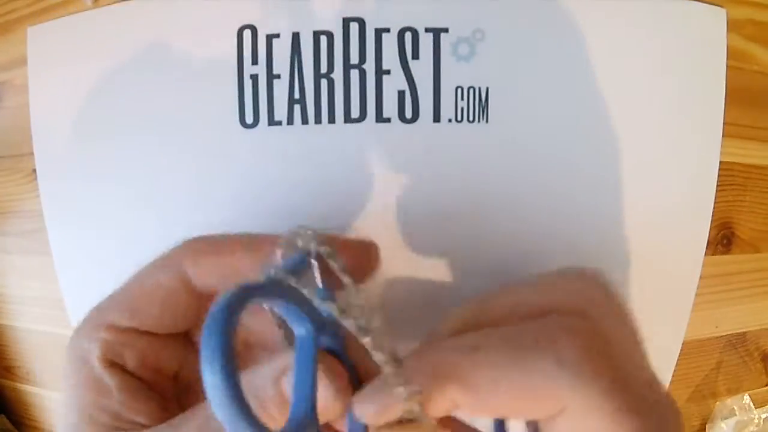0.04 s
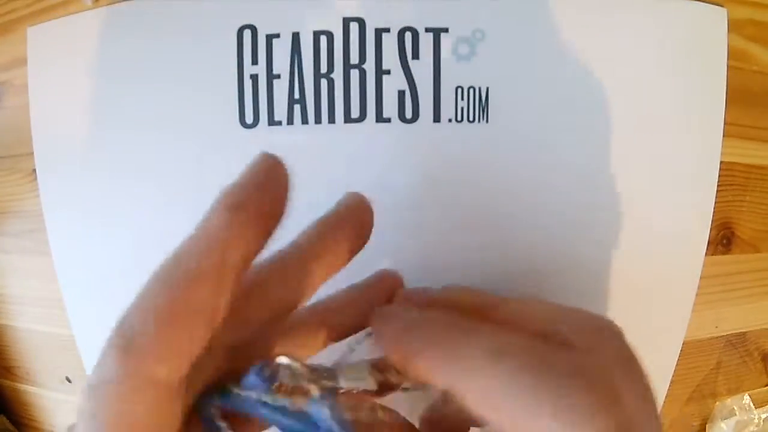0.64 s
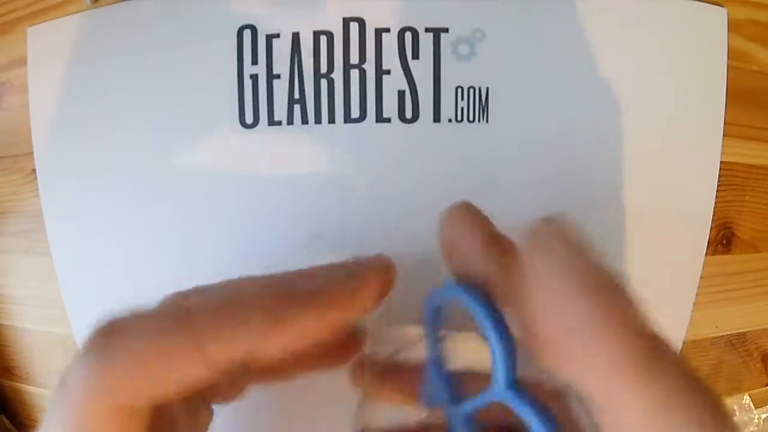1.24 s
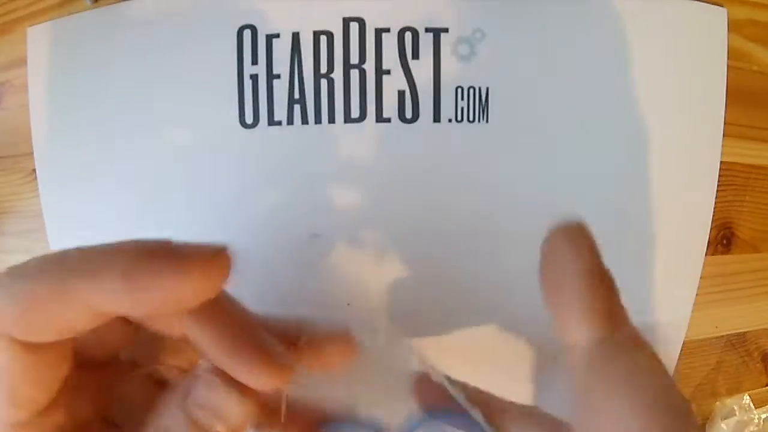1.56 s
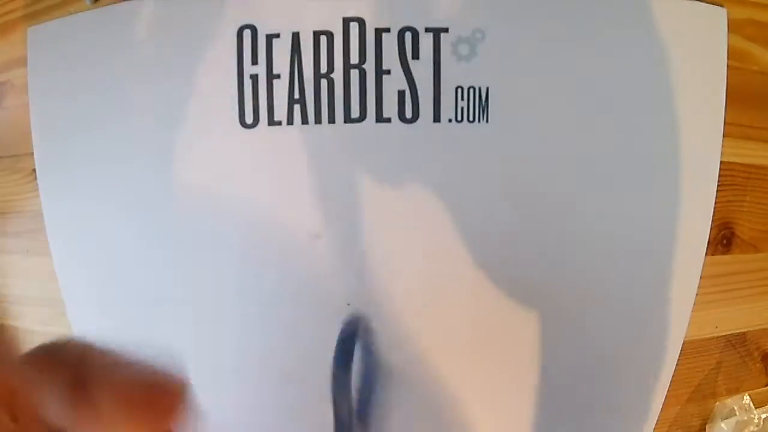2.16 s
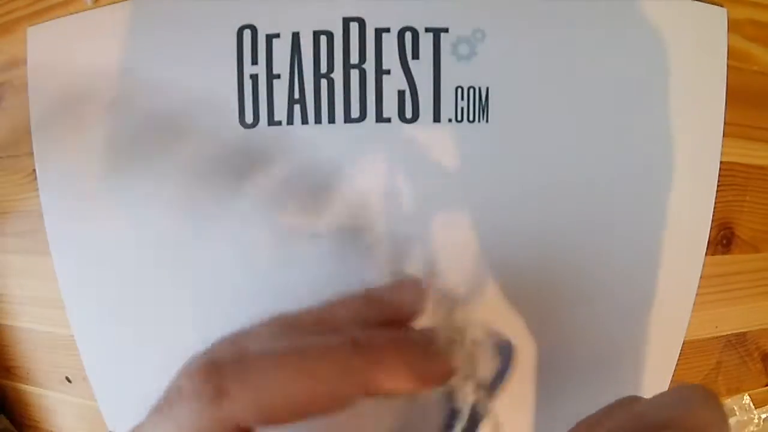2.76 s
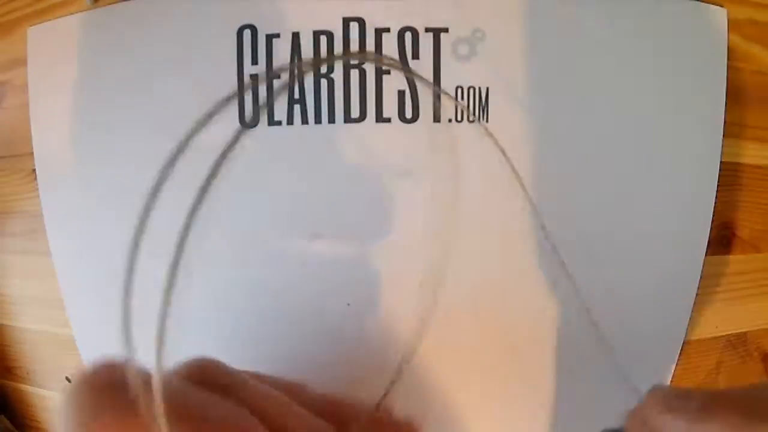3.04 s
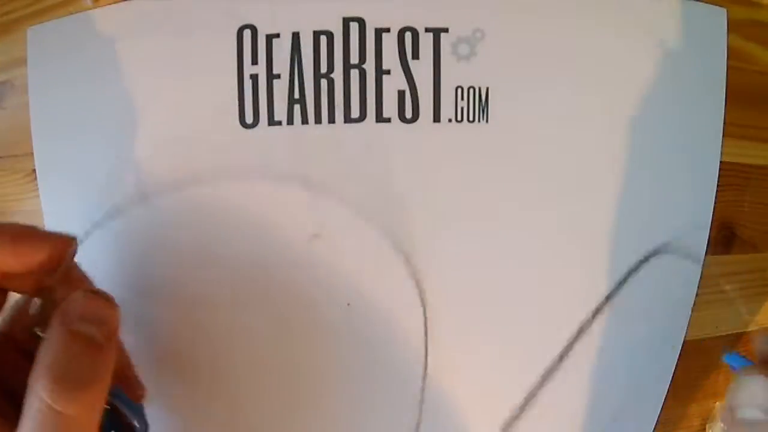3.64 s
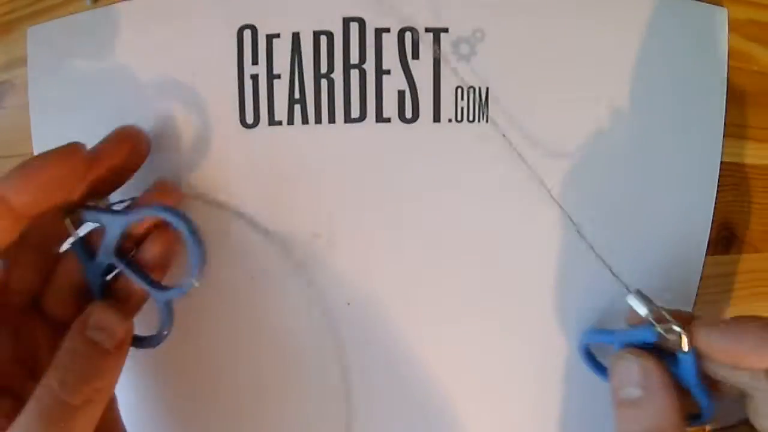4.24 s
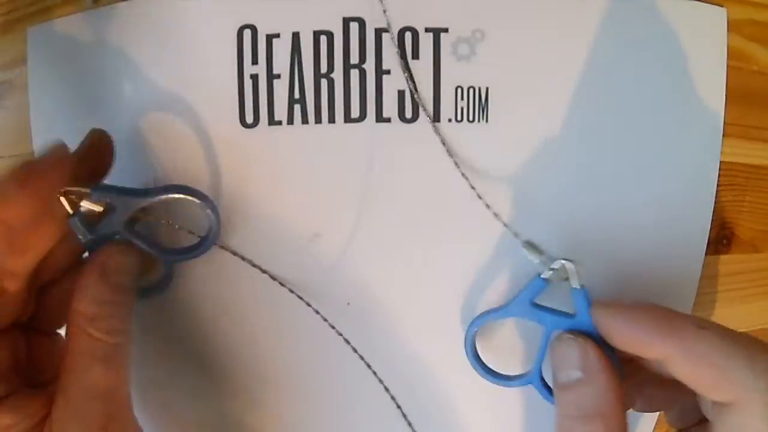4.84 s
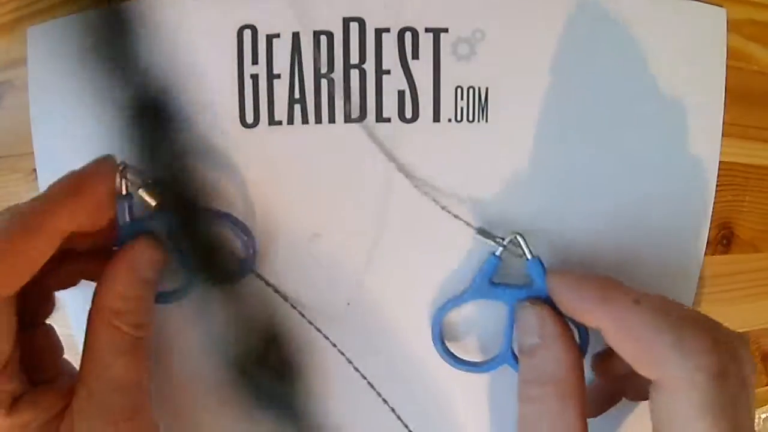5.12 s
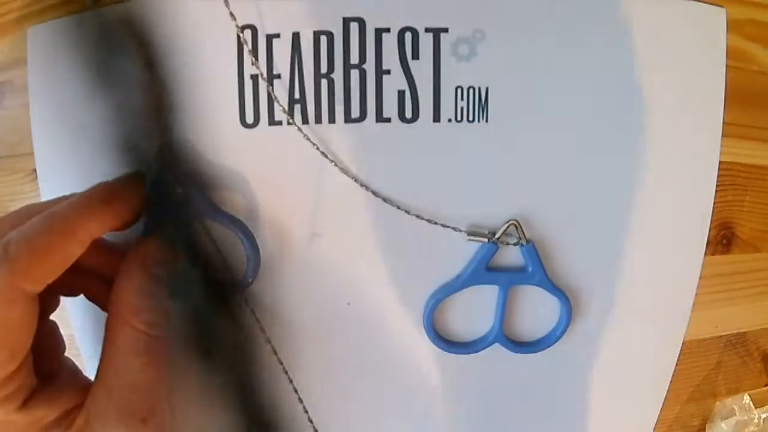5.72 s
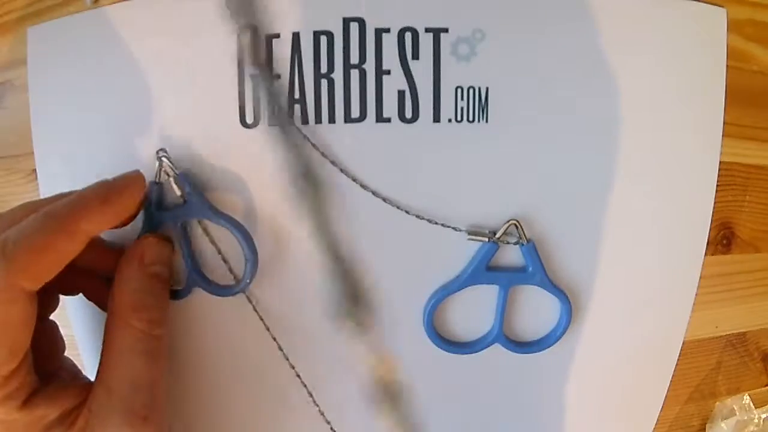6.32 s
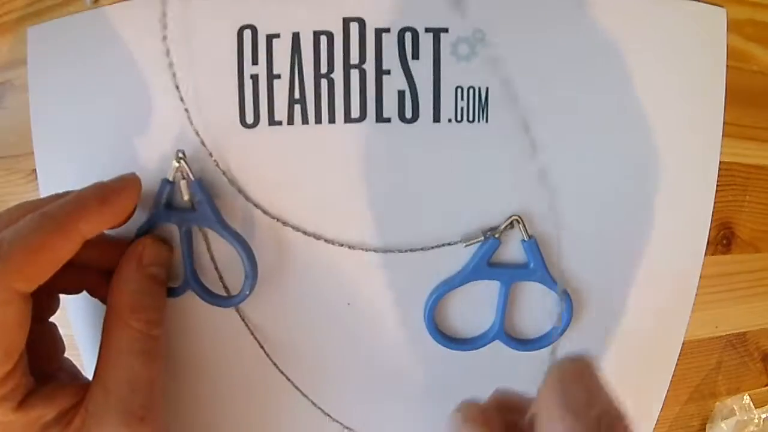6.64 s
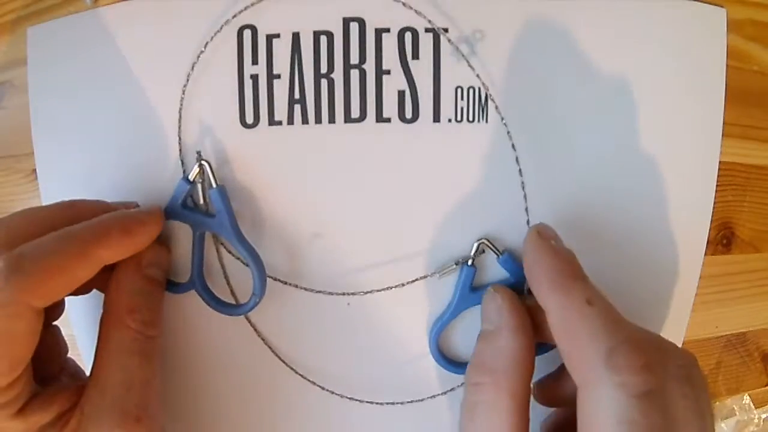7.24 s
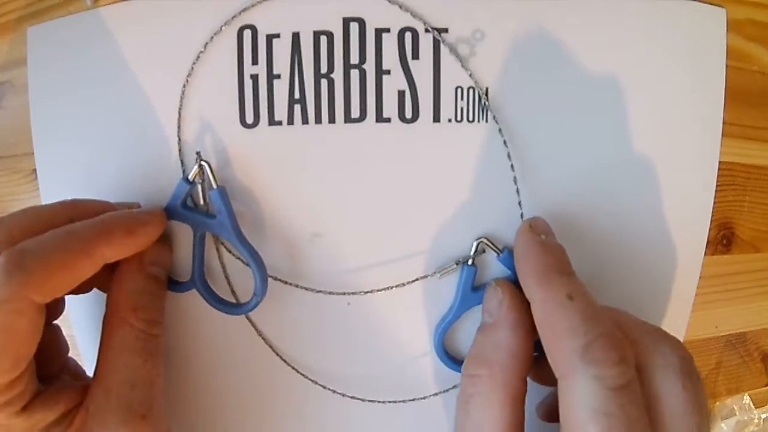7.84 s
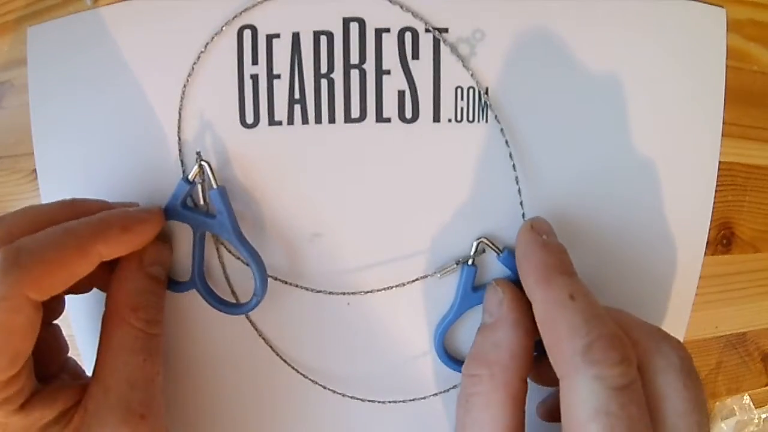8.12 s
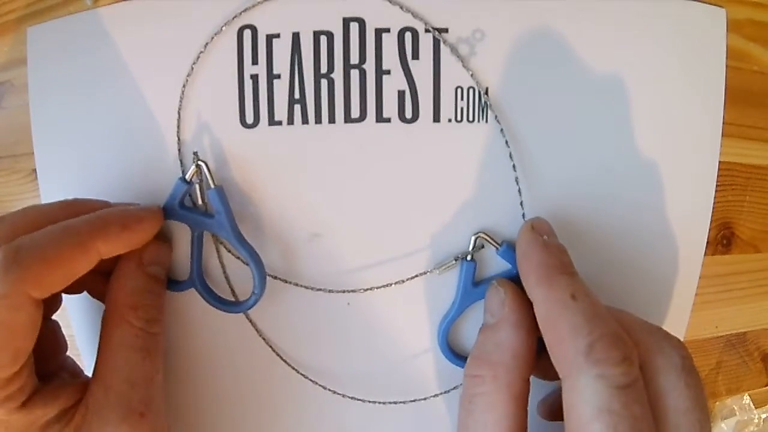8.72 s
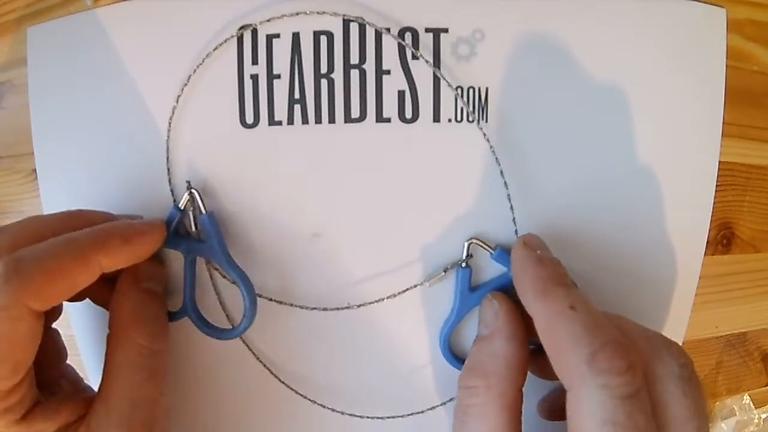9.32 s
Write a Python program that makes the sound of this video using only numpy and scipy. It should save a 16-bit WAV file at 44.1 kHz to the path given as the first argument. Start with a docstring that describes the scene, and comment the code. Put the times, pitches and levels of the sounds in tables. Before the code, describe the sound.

A springy wire is uncoiled by hand, crackling, twanging and scraping, and lashes against the microphone with loud, sharp knocks.

```python
"""Hands uncoil a twisted wire saw with plastic ring handles over a wooden table, under a small camera.
Over room air and a faint fan whine, skin rubs and the coil crackles and ticks. The table is bumped (1.8 s)
and the springy wire lashes the camera (2.1 s). The wire twangs (3 s) and strands rasp as the loops open;
a handle chafes in its link (4.1 s). The wire lashes again (4.6 s), drags along the housing and rattles
off it (5.05 s). The loop brushes the table (5.7 s); a few faint ticks and hand movements follow."""
import sys
import numpy as np
from scipy import signal
from scipy.fft import rfft, irfft
from scipy.io import wavfile

SR = 44100
rng = np.random.default_rng(int(sys.argv[2]) if len(sys.argv) > 2 else 0)


def digitize_waveform(pressure):
    """Quantize a signal to 16-bit integers and store it at the path in sys.argv[1].

    Rows of a 2-D input are taken as channels; values are limited to [-1, 1].
    """
    field = np.atleast_2d(pressure).T
    bounded = np.clip(field, -1, 1)
    quanta = np.round(bounded * 32767).astype(np.int16)
    wavfile.write(sys.argv[1], SR, quanta)


N = 417627
TIME_S = np.arange(N) / SR

# Source spectra. Each row: frequency in Hz, relative spectral density in dB.
AIR_SPECTRUM = [(15, -78), (25, -40.5), (141, -13), (174, -13.5), (204, -7), (353, -3.5), (393, -4.5),
                (436, -4), (663, -3.5), (718, -4.5), (776, -3.5), (885, -5.5), (2050, -18), (6330, -43.5),
                (9000, -53), (13200, -54.5)]
HAND_SPECTRUM = [(100, -19.5), (250, 6.5), (600, 5.5), (1100, 3), (1800, -0.5), (2600, -13), (5000, -32),
                 (9000, -48)]
COIL_SPECTRUM = [(1000, -14), (1700, 25), (3000, 2.5), (4500, -0.5), (5800, -3), (7000, -28), (8200, -17),
                 (9200, -0.5), (10500, -10.5), (12300, -11), (13500, -27)]
CRACK_SPECTRUM = [(290, -49.5), (500, -2), (1250, -7), (2220, 2), (2660, -18), (2920, -3.5), (3790, 2),
                  (4290, -13.5), (5060, -11.5), (6100, -17.5), (7120, -41), (9890, -33), (13200, -48.5)]
LASH_SPECTRUM = [(25, 7.5), (300, 5), (750, 1.5), (1000, -4), (1600, -10), (3100, -16), (4900, -25),
                 (6200, -29.5), (7200, -48), (9600, -43.5), (11500, -48), (13200, -70)]
UNWIND_SPECTRUM = [(700, -29.5), (1300, -7.5), (1800, 6), (2500, 5), (3050, -1), (3400, 1.5), (4000, -6),
                   (5000, -14.5), (6200, -21.5), (7100, -40.5), (9000, -36), (13000, -54)]
CHAFE_SPECTRUM = [(500, -35.5), (1200, -9), (1700, -2.5), (2600, 0), (3600, 0), (4000, -14), (6000, -21.5),
                  (7200, -42), (12000, -47)]
DRAG_SPECTRUM = [(88, -34), (150, -26.5), (210, -22), (546, -20.5), (611, 0), (780, -32.5), (856, -11),
                 (1530, -13.5), (2140, -5), (2540, -12.5), (3760, -8.5), (5070, -20), (7110, -48),
                 (9070, -36.5), (13200, -60)]
SWEEP_SPECTRUM = [(1200, 1.5), (2200, 4.5), (3100, -2), (4500, -2), (6000, -19.5), (7000, -35), (9500, -29),
                  (12000, -49), (14000, -51)]

# Resonances. Each row: frequency in Hz, T60 in seconds, gain at the peak in dB.
COIL_MODES = [(3020, 0.046, 17.5), (4840, .015, 3), (5770, 0.026, 14.5), (6200, 0.012, 11),
              (9060, 0.029, 3), (10800, .02, 7), (12400, 0.016, 8)]
TABLE_MODES = [(320, 0.035, 1.5), (419, 0.16, 4), (626, 0.12, -0.5), (719, 0.16, 10.5), (842, 0.018, -1.5),
               (1123, 0.04, -17.5)]
HOUSING_MODES = [(610, 0.087, -19.5), (1260, 0.094, -26), (1390, .04, -11), (2520, 0.025, -11.5),
                 (2813, 0.087, -13.5), (4000, 0.069, -16), (4750, .025, -10)]
UNWIND_MODES = [(2577, 0.057, 11.5), (2770, 0.06, 5), (3005, 0.031, 13.5), (3890, .03, 13),
                (4513, 0.025, 7), (4960, 0.037, 0)]
DRAG_MODES = [(610, .06, -6.5), (1298, .04, 0), (2220, .04, 10.5), (3440, 0.0083, 6.5), (3950, .025, 10),
              (4990, 0.016, 14.5), (6130, 0.024, 23.5)]
SWEEP_MODES = [(3100, 0.039, 23), (3530, 0.023, 14.5), (4240, 0.04, 7), (4380, 0.024, -1), (5010, 0.033, 9),
               (6000, 0.014, 10.5)]

# Fan tones. Each row: frequency in Hz, rms level in dB.
FAN_TONES = [(430, -71.5), (706.5, -65), (8000, -107)]
# Skin and sleeve movement. Each row: time in seconds, relative level in dB.
HAND_LEVELS = [(0, -56.5), (1.3, -59), (1.75, -57), (1.9, -57), (2.05, -61.5), (2.55, -57.5), (2.9, -64),
               (3.2, -92.5), (8.8, -67), (9.45, -60.5)]
# Coil shifting in the fingers. Each row: start in seconds, length in seconds, level in dB.
COIL_SHIFTS = [(0.106, 0.014, -73.5), (0.151, 0.023, -76.5), (.295, .04, -64.5), (0.361, .06, -72.5),
               (.54, 0.028, -74.5), (0.61, .19, -76), (0.806, 0.0047, -54.5), (1.013, .012, -77),
               (1.115, 0.019, -63.5), (1.33, 0.056, -79.5), (1.582, .01, -76.5), (1.637, 0.013, -79),
               (2.753, .07, -84.5)]
# Small knocks. Each row: start in seconds, peak in dB, ring in Hz, T60 in seconds, crack-to-ring in dB.
TICKS = [(0.684, -40.5, 1800, 0.016, -19), (0.8098, -32, 2970, 0.054, -1), (1.125, -36.5, 2870, 0.041, -14),
         (1.8412, -45.5, 2060, .03, -6), (2.381, -43.5, 2960, 0.047, -6),
         (3.0451, -13.5, 2310, 0.0065, -16.5), (4.136, -39.5, 2240, .01, -21), (4.56, -43, 3240, .03, -9),
         (5.3213, -46, 2290, .03, -6), (5.7119, -20.5, 3780, 0.0087, -10), (5.7668, -31, 2300, .027, -12),
         (5.7874, -30.5, 2225, 0.031, -3), (7.2439, -50.5, 3303, 0.022, -10),
         (9.0618, -50.5, 1880, .02, -3), (9.079, -51, 4920, .02, 6)]
# Knocks on the table, and the low body of the wire's twang at 3.04 s.
# Each row: start in seconds, peak in dB, skid decay in seconds.
BUMPS = [(1.843, -21, 0.0073), (3.041, -33.5, 0.004), (5.014, -29, 0.0097), (5.05, -32.5, 0.016),
         (5.124, -38, 0.0032), (5.71, -40, 0.0031)]
# Wire hitting the camera. Each row: start in seconds, bounce count, thump in dB, clang in dB,
# clang centre in Hz, low cut in Hz.
LASHES = [(2.11, 3, -21, -17.5, 1874, 19), (2.127, 3, -19, -23.5, 1440, 20),
          (2.1407, 5, -15, -19.5, 1886, 30), (2.2521, 2, -18, -17.5, 1850, 10),
          (2.2633, 1, -14.5, -15, 1230, 9), (2.274, 1, -17, -15, 1160, 10), (2.576, 2, -13, -15, 1950, 43),
          (2.667, 2, -14, -16.5, 1400, 35), (4.619, 3, -21, -21.5, 1073, 30),
          (4.6428, 1, -18.5, -15, 1475, 20), (4.6562, 2, -11.5, -26, 1800, 8.8),
          (4.689, 3, -16.5, -16.5, 1700, 40), (4.711, 1, -12, -12.5, 1720, 7),
          (4.7208, 1, -10.5, -20.5, 1440, 10), (4.727, 1, -20, -27.5, 1160, 30),
          (4.7356, 2, -12, -19, 2200, 11), (5.1767, 1, -12.5, -20.5, 2260, 190)]
# Sliding strokes. Each row: start in seconds, length in seconds, level in dB, relative treble in dB.
UNWIND_STROKES = [(3.045, 0.054, -46.5, -11), (3.135, 0.072, -51, -14.5), (3.235, 0.056, -53, -25),
                  (3.305, 0.13, -49.5, -16), (3.44, 0.069, -57, 0.5), (3.555, 0.13, -55, -2.5),
                  (3.772, 0.067, -57, -3), (3.895, 0.041, -60.5, -12), (4.025, 0.015, -67, 2),
                  (4.3, 0.0517, -67, -2), (4.35, 0.035, -60, 1.5), (4.4, .1, -60.5, -16),
                  (4.555, 0.012, -57.5, -1)]
CHAFE_STROKES = [(4.134, .08, -51.5, -22), (4.25, .016, -58.5, -24)]
DRAG_STROKES = [(4.665, 0.049, -36, -3.5), (4.745, 0.066, -56, -11), (4.789, 0.086, -43.5, -5.5),
                (4.873, .06, -47.5, -8), (4.938, 0.079, -42.5, -4), (5.04, 0.037, -51, -3),
                (5.113, 0.0098, -42, -6), (5.15, 0.011, -34.5, -9), (5.185, 0.021, -40, -10)]
SWEEP_STROKES = [(5.71, .06, -70, -2), (5.805, 0.025, -64.5, 0.5), (6.18, 0.08, -68, -14),
                 (6.24, 0.041, -61, -17), (6.3, 0.046, -51.5, -10), (6.35, 0.037, -55.5, -0.5),
                 (6.573, .033, -59, 1), (6.72, 0.026, -64, -12), (6.8, 0.11, -60.5, -9),
                 (6.865, 0.034, -55.5, -9)]
# Room decay. Each row: frequency in Hz, T60 in seconds.
ROOM_DECAY = [(200, 0.13), (1000, 1), (4000, 0.15), (12000, 0.099)]


def amp(db):
    """Decibels to gain."""
    return 10 ** (np.asarray(db) / 20)


def unit_rms(x):
    """Scales to rms 1."""
    return x / np.sqrt(np.mean(x ** 2) + 1e-30)


def lookup(table, hz):
    """Interpolates on a log-frequency axis."""
    table_hz, values = np.transpose(table)
    return np.interp(np.log(hz + 1), np.log(table_hz + 1), values)


def add(mix, start_s, sound):
    """Mixes a sound in at start_s."""
    part = mix[max(round(start_s * SR), 0):][:len(sound)]
    part += sound[:len(part)]


def colour(x, spectrum, size=2048):
    """Minimum-phase filter with the given spectrum."""
    hz = abs(np.fft.fftfreq(size, 1 / SR))
    log_gain = np.log(amp(np.maximum(lookup(spectrum, hz), -100)))
    taps = np.fft.ifft(np.exp(np.conj(signal.hilbert(log_gain)))).real
    return signal.oaconvolve(x, taps[:size // 2])[:len(x)]


def band(x, low_hz, high_hz):
    """Butterworth band-pass."""
    return signal.sosfilt(signal.butter(4, [low_hz, high_hz], "band", fs=SR, output="sos"), x)


def ringing(x, modes):
    """Response of damped modes driven by x."""
    out = np.zeros(len(x))
    for hz, t60_s, db in modes:
        radius = np.exp(-np.log(1000) / (t60_s * SR))
        pole = radius * np.exp(2j * np.pi * hz / SR)
        out += amp(db) * 2 * signal.lfilter([1 - radius], [1, -pole], x + 1e-18).real
    return out


def stroke(t, start_s, length_s, attack_s, release_s):
    """Envelope of one slide: speeds up, holds, dies away."""
    rise = np.clip((t - start_s) / attack_s, 0, 1)
    return rise * np.exp(-np.clip((t - start_s - length_s) / release_s, 0, 20))


def slips(samples, per_s, spread_db, clump_db, clump_s, hiss):
    """Stick-slip friction: uneven clicks over a smooth rub, in clumps."""
    sizes = amp(spread_db * np.minimum(rng.exponential(1, samples), 3.5))
    clicks = sizes * rng.choice([-1, 1], samples) * (rng.random(samples) < per_s / SR)
    rub = unit_rms(clicks) + hiss * rng.standard_normal(samples)
    t = np.arange(samples) / SR
    knots_s = np.arange(0, t[-1] + clump_s, clump_s)
    return rub * amp(clump_db * np.interp(t, knots_s, rng.uniform(-1.5, 1, len(knots_s))))


def scrape(strokes, spectrum, modes, per_s, clump_db, attack_s, release_s, detune=0.023):
    """Surfaces catch and slip; any modes are retuned slightly for each stroke."""
    t, out = np.arange(16384) / SR, np.zeros(N)
    highpass = signal.butter(4, 4200, "high", fs=SR, output="sos")
    for start_s, length_s, db, treble_db in strokes:
        rub = slips(len(t), per_s, spread_db=2, clump_db=clump_db, clump_s=.009, hiss=.6)
        retuned = [(hz * (1 + detune * rng.uniform(-0.82, 1)), *rest) for hz, *rest in modes]
        rub = colour(rub + ringing(rub, retuned), spectrum)
        treble = signal.sosfiltfilt(highpass, rub)
        body = (rub - treble) / np.std(band(rub, 2000, 4200))
        gain = amp(db) * stroke(t, 0, length_s, attack_s, release_s)
        add(out, start_s, gain * (body + amp(treble_db) * unit_rms(treble)))
    return out


def room_air(rms_db=-56):
    """Steady air noise."""
    return amp(rms_db) * unit_rms(colour(rng.standard_normal(N), AIR_SPECTRUM, size=8192))


def fan_whine(waver_hz=1.5):
    """Faint fan tones, each wavering in pitch."""
    knots_s, out = np.arange(0, TIME_S[-1] + 1, .1), np.zeros(N)
    for hz, db in FAN_TONES:
        drift_hz = waver_hz * np.interp(TIME_S, knots_s, rng.standard_normal(len(knots_s)))
        out += amp(db) * np.sqrt(2) * np.sin(2 * np.pi * np.cumsum(hz + drift_hz) / SR)
    return out


def hands(trim_db=-1):
    """Soft, dull friction of skin and cloth."""
    rub = colour(slips(N, per_s=1500, spread_db=2, clump_db=1, clump_s=.03, hiss=1), HAND_SPECTRUM)
    gain = amp(trim_db + np.interp(TIME_S, *np.transpose(HAND_LEVELS)))
    return gain * rub / np.std(band(rub, 660, 2200))


def coil_crackle(attack_s=.006, release_s=.009):
    """Turns rub in the fingers; each slips on its own and rings its own mode."""
    rub, *turns = [slips(N, per_s=600, spread_db=2.5, clump_db=6, clump_s=.012, hiss=.2)
                   for _ in range(len(COIL_MODES) + 1)]
    tinkle = sum(ringing(turn, [mode]) for turn, mode in zip(turns, COIL_MODES))
    crackle = colour(rub + tinkle, COIL_SPECTRUM)
    gain = sum(amp(db) * stroke(TIME_S, start_s, length_s, attack_s, release_s)
               for start_s, length_s, db in COIL_SHIFTS)
    return gain * crackle / np.std(band(crackle, 4500, 13000))


def tick(peak_db, ring_hz, t60_s, crack_db, crack_s=0.0018, tail_s=0.015, tail_db=-20):
    """A short crack and one ring, pitched by the free length of wire."""
    t = np.arange(4096) / SR
    decay = np.exp(-t / crack_s) + amp(tail_db) * np.exp(-t / tail_s)
    crack = colour(rng.standard_normal(len(t)) * decay, CRACK_SPECTRUM)
    onset = 1 - np.exp(-(t / 0.00033) ** 2)
    ring = onset * np.sin(2 * np.pi * ring_hz * t) * np.exp(-np.log(1000) * t / t60_s)
    sound = ring + amp(crack_db) * 2 * crack / abs(crack).max()
    return amp(peak_db) * sound / abs(sound).max()


def ticks():
    """Wire, crimps and handles knock together."""
    out = np.zeros(N)
    for start_s, *settings in TICKS:
        add(out, start_s, tick(*settings))
    return out


def bumps(direct_gain=0.38):
    """Soft knocks ring the table top, longer in a skid; one bump is the low body of the wire's twang."""
    t, out = np.arange(8192) / SR, np.zeros(N)
    for start_s, peak_db, skid_s in BUMPS:
        push = rng.standard_normal(len(t)) * np.exp(-t / skid_s)
        bump = band(direct_gain * push + ringing(push, TABLE_MODES), 300, 1280)
        add(out, start_s, amp(peak_db) * bump / abs(bump).max())
    return out


def bounces(gap_s=.0045, jitter_s=.0006, spread_db=4.5, rasp_db=-30.5):
    """Splits each lash into quick, uneven contacts; the rasp is independent of the lash's force."""
    for start_s, count, thump_db, clang_db, clang_hz, low_cut_hz in LASHES:
        for k in range(round(count)):
            late, pitch, *force = rng.uniform(-1, 1, size=5)
            rebound = min(k, 1)
            contact_s = start_s + k * gap_s + rebound * late * jitter_s
            levels_db = np.array([thump_db, clang_db, rasp_db]) + spread_db * np.array(force)
            yield contact_s, levels_db, clang_hz * np.exp(rebound * 0.57 * pitch), low_cut_hz


def lashes(lead_s=.006, bend_hz=1700, chatter_s=0.0061, chatter_lead_s=.005, stop_s=0.014, size=4096):
    """Wire hits the housing. High bending waves run faster: a falling chirp ends in a thump."""
    hz = np.fft.rfftfreq(size, 1 / SR)
    t = (np.arange(size) - size // 4) / SR
    low = 1 / (1 + (hz / 720) ** 4)
    high = 1 / (1 + (3300 / (hz + 1)) ** 8)
    zones = np.array([low, np.maximum(1 - low - high, 0), high]) * amp(lookup(LASH_SPECTRUM, hz))
    chatter_gains = np.array([.25, .7, 1.5])[:, None]  # per zone: thump, clang, rasp
    age_s = np.maximum(t + chatter_lead_s, 0)
    touch = (1 - np.exp(-age_s / 0.0005)) * np.exp(-(age_s / stop_s) ** 4)
    out = np.zeros(N)
    for contact_s, levels_db, clang_hz, low_cut_hz in bounces():
        # each contact lands on another spot: own clang, dispersion and mode levels
        clang = amp(7 * np.exp(-(np.log((hz + 1) / clang_hz) / 0.4) ** 2))
        knee_hz = bend_hz * np.exp(rng.uniform(-1, 1))
        modes = [(mode_hz, t60_s, db + rng.uniform(-9, 4)) for mode_hz, t60_s, db in HOUSING_MODES]
        delay_s = -t[0] + lead_s * (1 / np.sqrt(1 + hz / knee_hz) - 1)
        chirp = rng.choice([-1, 1]) * np.exp(-2j * np.pi * (np.cumsum(delay_s) - delay_s[0]) * SR / size)
        # twisted strands chatter over the edge
        chatter = rng.standard_normal(size) * touch * np.exp(-(age_s / chatter_s) ** 2)
        drive = chirp + chatter_gains * rfft(chatter / np.linalg.norm(chatter))
        low_cut = hz / (hz - 1j * low_cut_hz)
        parts = touch * irfft(zones * clang * drive * low_cut, size)
        gains = np.sqrt(.004 * SR) * amp(levels_db) / np.linalg.norm(parts, axis=1)  # rms over 4 ms
        blow = gains @ parts
        add(out, contact_s + t[0], blow + ringing(blow, modes))
    return out


def unwinding():
    """Strand slides on strand as the loops spring open."""
    return scrape(UNWIND_STROKES, UNWIND_SPECTRUM, UNWIND_MODES,
                  per_s=640, clump_db=1.5, attack_s=.012, release_s=0.033, detune=.008)


def handle_chafe():
    """A handle rubs as it turns in its metal link."""
    return scrape(CHAFE_STROKES, CHAFE_SPECTRUM, modes=[],
                  per_s=2000, clump_db=-2.5, attack_s=0.0027, release_s=.007)


def housing_drag():
    """Wire catches and slips along the camera housing."""
    return scrape(DRAG_STROKES, DRAG_SPECTRUM, DRAG_MODES,
                  per_s=1600, clump_db=7.5, attack_s=0.0082, release_s=.012)


def rattle(start_s=5.05, gap_s=.0206, jitter_s=0.00207, count=10,
           first_db=-36, rise_db_per_s=22.5, spread_db=2, ring_hz=3810, detune=0.087):
    """The wire's twists skip over the housing's edge in turn, harder as it pulls free."""
    out = np.zeros(N)
    for k, (late, force, pitch) in enumerate(rng.uniform(-1, 1, (count, 3))):
        age_s = k * gap_s + late * jitter_s
        peak_db = first_db + rise_db_per_s * age_s + spread_db * force
        add(out, start_s + age_s, tick(peak_db, ring_hz * (1 + detune * pitch), t60_s=.027, crack_db=-3))
    return out


def table_sweeps():
    """The loop brushes the table as it is laid out."""
    return scrape(SWEEP_STROKES, SWEEP_SPECTRUM, SWEEP_MODES,
                  per_s=530, clump_db=3.5, attack_s=0.019, release_s=0.014)


def reverb(x):
    """Diffuse tail of a small room, longest in the midrange."""
    hz, t, noise = signal.stft(rng.standard_normal(SR // 2), SR, nperseg=256)
    decay = np.exp(-np.log(1000) * t / lookup(ROOM_DECAY, hz)[:, None])
    tail = signal.istft(noise * decay, SR, nperseg=256)[1]
    return signal.oaconvolve(x, tail / np.linalg.norm(tail))[:N]


def scene():
    """Mono mix. Airborne sound carries the room; sound through the housing is almost dry."""
    saw = coil_crackle() + ticks() + unwinding() + handle_chafe() + rattle() + table_sweeps()
    airborne = band(saw, 250, 14000) + hands() + bumps()  # thin wire radiates no bass
    contact = lashes() + housing_drag()
    echo = reverb(amp(-18) * airborne + amp(-41.5) * band(contact, 300, 6000))
    lowpass = signal.butter(12, 12500, fs=SR, output="sos")
    handling = signal.sosfilt(lowpass, airborne + contact + echo)
    return (handling + room_air() + fan_whine())[None]


def record(dry, ceiling=.85, notch_hz=759, width_hz=42, cutoff_hz=15700):
    """Camera: soft peak clipping, one narrow notch, band limit."""
    clipped = dry / (1 + (dry / ceiling) ** 4) ** (1 / 4)
    notched = signal.lfilter(*signal.iirnotch(notch_hz, notch_hz / width_hz, SR), clipped)
    lowpass = signal.firwin(511, cutoff_hz, window=("kaiser", 9), fs=SR)
    return signal.oaconvolve(notched, lowpass[None], "same")


dry = scene()
out = record(dry)
digitize_waveform(out)
```